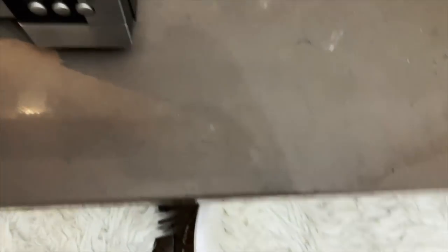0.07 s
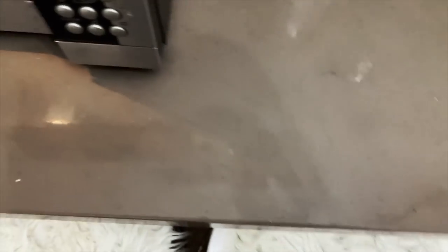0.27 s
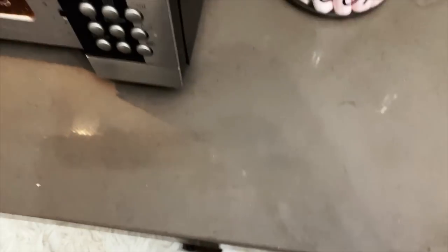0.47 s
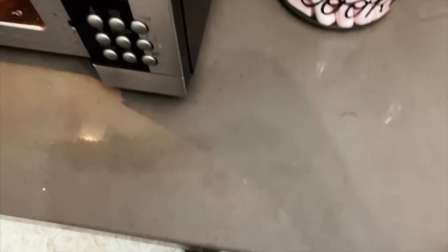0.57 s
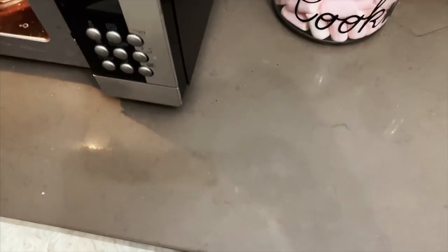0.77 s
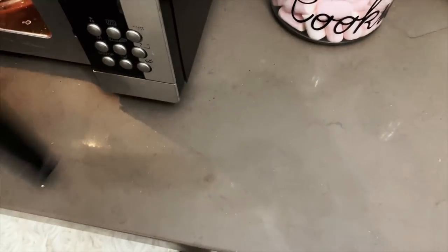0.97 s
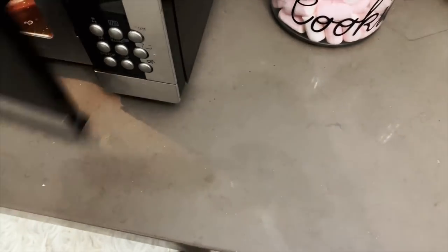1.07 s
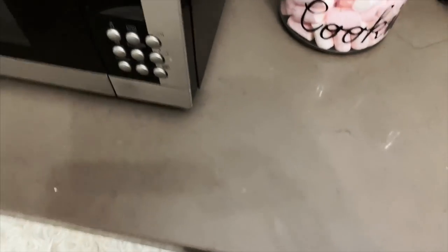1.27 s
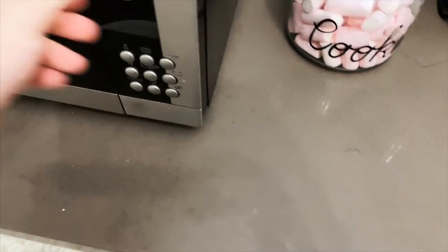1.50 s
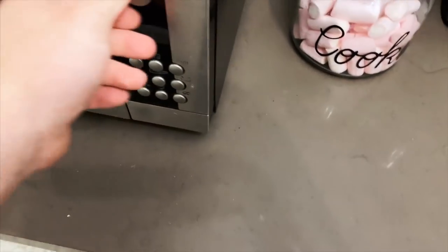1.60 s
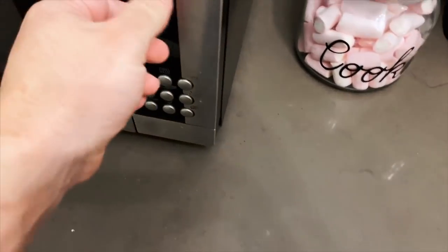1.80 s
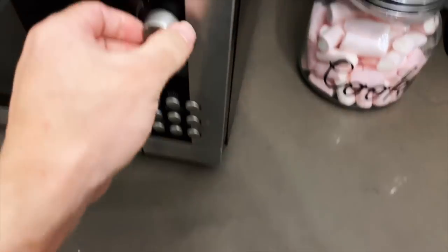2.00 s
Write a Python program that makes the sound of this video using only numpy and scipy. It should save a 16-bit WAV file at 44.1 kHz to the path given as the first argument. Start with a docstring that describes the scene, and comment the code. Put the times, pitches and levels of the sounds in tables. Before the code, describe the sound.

A microwave door closing, heard close in a lightly reverberant kitchen. A dull knock is already fading at 0 seconds, its low hum lingering under faint scuffs, soft bumps and tiny sharp ticks. Around 1.1 seconds the hooks hit, the latch snaps and the door thumps the hollow metal case. A ringing clack follows at 1.3, then quiet dial clicks from 1.76 to 1.9 over low rumble and light rustle.

```python
"""Microwave door pushed shut

An earlier knock hums on in a kitchen while scuffs, soft bumps and small sharp ticks come and go.
Heard close by, hooks meet a catch, a latch snaps, the door thumps on the hollow case and a clack follows inside.
Then a dial turns through a few detents. Blows are shaped bursts of banded noise; ringing parts are decaying sines.
Rumble and rustle are coloured noise; the mix leans slightly left."""
import sys
import numpy as np
from scipy import signal
from scipy.io import wavfile

SR = 44100
rng = np.random.default_rng(int(sys.argv[2]) if len(sys.argv) > 2 else 0)


def generate_wav(signal):
    """Clip the signal to [-1, 1] and save it as 16-bit WAV at the path in sys.argv[1]."""
    frames = np.transpose(np.atleast_2d(signal))
    scaled = np.clip(frames, -1, 1) * 32767
    pcm = np.round(scaled).astype(np.int16)
    wavfile.write(sys.argv[1], SR, pcm)


N = 90404
AGE = np.arange(SR) / SR   # time since a sound began, s
EDGES_HZ = 22 * 2 ** (np.arange(30) / 3)   # third octaves
CENTRES_HZ = np.sqrt(EDGES_HZ[1:] * EDGES_HZ[:-1])
MODE_SWELL_CYCLES = 2.33   # high modes speak at once, low ones bloom
WAVER = 0.35   # depth of a mode's swings, in log gain and in radians of phase

# correlation of the left and right channels: (frequency [Hz], likeness [-1 to 1])
STEREO_LIKENESS = [(60, 1), (170, 0.91), (350, 0.84), (700, 0.09), (1300, -0.017), (2600, 0.13),
                   (5000, 0.12), (12000, 0.055)]


def from_db(db):
    """Decibels to gain."""
    return 10 ** (np.asarray(db) / 20)


def at_bands(points):
    """Reads a table over frequency at the band centres, on a logarithmic frequency axis."""
    hz, value = np.transpose(points)
    return np.interp(np.log(CENTRES_HZ), np.log(hz), value)


def dying(t60):
    """One second of exponential decay, falling 60 dB in t60 seconds."""
    return np.exp(-np.log(1000) * AGE / t60)


def add(out, s, sound):
    """Mixes a sound in at time s, trimming whatever falls outside the scene."""
    start = int(round(s * SR))
    first, last = max(start, 0), min(start + sound.shape[-1], N)
    out[:, first:last] += sound[..., first - start:last - start]


def noise_bands():
    """White noise in third octaves, nearly mono in the bass and wide above: bands x 2 x N."""
    white = rng.standard_normal((2, 2, N + SR // 2))
    likeness = np.clip(at_bands(STEREO_LIKENESS), -.99, .995)
    bands = []
    for k, alike in enumerate(likeness):
        sos = signal.butter(2, EDGES_HZ[k:k + 2], "band", fs=SR, output="sos")
        # neighbouring bands use different noise; the filter's start-up is dropped
        mid, side = signal.sosfilt(sos, white[k % 2])[:, -N:]
        common = np.sqrt((1 + alike) / 2) * mid
        opposed = np.sqrt((1 - alike) / 2) * side * [[1], [-1]]
        bands.append(common + opposed)
    return np.array(bands, dtype=np.float32)


def blows(bands, rows, colour, ring_s, room_db, crack=0):
    """Each blow is a noise burst with a short ring (t60 ring_s) and a kitchen tail; low bands build up later."""
    # decay of the kitchen: (frequency [Hz], t60 [s])
    room_t60 = [(60, 1), (150, 0.96), (450, 0.61), (1000, 0.64), (2500, 0.5), (5000, 0.48), (9000, 0.43),
                (14000, 0.21)]
    swell_cycles, room_build_s, crack_s = 0.51, 0.004, 0.0022   # crack: t60 of the sharp first instant
    tilt_pivot_hz = 4000
    quiet_db = -27   # blows at or below this level are cut to a third of a second

    out, age = np.zeros((2, N)), AGE.astype(np.float32)
    room = np.exp(np.outer(-np.log(1000) / at_bands(room_t60), age).astype(np.float32))
    build = (from_db(room_db) * (1 - np.exp(-AGE / room_build_s))).astype(np.float32)
    swell = np.minimum(np.outer((CENTRES_HZ / swell_cycles).astype(np.float32), age), 1)
    own_ring = (dying(ring_s) + crack * dying(crack_s)).astype(np.float32)
    shape = swell * (own_ring + build * room)
    octaves = np.log2(CENTRES_HZ / tilt_pivot_hz)
    for s, db, *tilt in rows:
        gains = from_db(db + at_bands(colour) + sum(tilt) * octaves).astype(np.float32)
        size = SR if db > quiet_db else SR // 3
        start = rng.integers(N - SR)   # a random stretch of noise for each blow
        noise = bands[:, :, start:start + size]
        add(out, s, np.einsum("bct,bt->ct", noise, shape[:, :size] * gains[:, None]))
    return out


def ringing(modes, swell_cycles=MODE_SWELL_CYCLES, waver=WAVER):
    """Struck modes swell, waver and die as sines; less alike frequencies differ more in phase left to right."""
    wavers_per_s = 29.3
    out = np.zeros((2, SR))
    for k, (hz, db, t60) in enumerate(modes):
        alike = np.interp(hz, CENTRES_HZ, at_bands(STEREO_LIKENESS))
        apart = np.arccos(np.clip(alike, -1, 1)) / 2 * (-1) ** k   # the leading side alternates
        walks = rng.standard_normal(size=(2, 100))
        swing, slip = (waver * np.interp(AGE * wavers_per_s, np.arange(len(w)), w) for w in walks)
        swell = 1 - np.exp(-(AGE * hz / swell_cycles) ** 2)
        strength = from_db(db) * swell * dying(t60) * np.exp(swing)
        out += strength * np.sin(2 * np.pi * hz * AGE + slip + [[apart], [-apart]])
    return out


def wash(bands, colour):
    """Steady coloured noise, rms 1."""
    x = np.einsum("bct,b->ct", bands, from_db(at_bands(colour)).astype(np.float32))
    return x / x.std()


def without_bass(x):
    """Small hard parts radiate little deep bass, so their contacts are high-passed."""
    # the tiny offset keeps the filter out of denormal numbers
    return signal.sosfilt(signal.butter(4, 101, "high", fs=SR, output="sos"), x + 1e-18)


def hooks(bands):
    """The hooks strike the catch: two hard contacts, and the brief ring of the catch."""
    # contacts: (time [s], level [dB], tilt [dB per octave])
    contacts = [(1.109, -7.5, 1.5), (1.1118, -13.5, -1.5)]
    # spectrum of a contact: (frequency [Hz], level [dB])
    colour = [(40, -20), (130, 5.5), (400, 0), (750, 5), (1400, -7.5), (2400, -4), (4500, -10),
              (8000, -19.5), (14000, -19.5)]
    # resonances of the catch: (frequency [Hz], level [dB], t60 [s])
    catch_modes = [(466, 10.5, 0.074), (642, -1.5, 0.18), (1017, -5.5, 0.11), (2420, -4.5, 0.03),
                   (4820, -4, .05)]
    out = without_bass(blows(bands, contacts, colour, ring_s=0.055, room_db=-2.5))
    add(out, contacts[0][0], from_db(-18) * ringing(catch_modes))
    return out


def latch(bands):
    """The latch snaps over in a quick run of bright contacts and sets off the door's metal skin."""
    # snaps: (time [s], level [dB], tilt [dB per octave])
    snaps = [(1.132, -12, -0.5), (1.1341, -10.5, -5), (1.1389, -14, -5.5), (1.1438, -10.5, 1),
             (1.1482, -14.5, -2.5), (1.1603, -13.5, -2.5)]
    # spectrum of a snap: (frequency [Hz], level [dB])
    colour = [(200, -2), (700, -4.5), (2000, 1.5), (3800, 6), (5500, 0.5), (7500, 3.5), (10000, 2.5),
              (14000, 3)]
    # resonances of the door's skin: (frequency [Hz], level [dB], t60 [s])
    skin_modes = [(1007.6, -3.5, 0.55), (1008, -7, .35), (1206, -3, 0.3), (1344, -3.5, 0.67),
                  (1374, -3, 0.74), (1494, -13, 0.42), (2090, 6, 0.17), (2490, -7, 0.63), (2687, -2, 0.11),
                  (3190, -3.5, 0.34), (3820, -7, 0.17), (7580, -4, 0.2)]
    skin_s, skin_db = 1.147, -23.5
    out = without_bass(blows(bands, snaps, colour, ring_s=0.026, room_db=-19.5))
    add(out, skin_s, from_db(skin_db) * ringing(skin_modes))
    return out


def slam(bands):
    """The door lands and chatters; its weight pushes the hollow case, which booms at its low modes."""
    # landings: (time [s], level [dB])
    landings = [(1.1515, -1.5), (1.165, -6.5), (1.178, -18), (1.185, -10)]
    # spectrum of a landing: (frequency [Hz], level [dB])
    colour = [(30, -26), (70, -5), (130, 11), (240, 0.5), (600, 6), (1000, -4.5), (2100, -6.5), (4000, -15),
              (8000, -20), (14000, -33)]
    # resonances of the case: (frequency [Hz], level [dB], t60 [s])
    case_modes = [(60.7, -25, 0.57), (103.4, -21.5, 0.5), (121.5, -15, 0.3), (134.2, -1.5, 0.12),
                  (166.6, -21, 0.44), (209, -13, 0.19), (268, -14, 0.29), (324, -26.5, 0.36),
                  (409.3, -23, 0.37), (533.3, -23.5, 0.49), (646.7, -22, 0.18), (672, -21.5, 0.34),
                  (788, -28, 0.35)]
    thump_s, thump_db = 1.148, 4.5
    out = without_bass(blows(bands, landings, colour, ring_s=0.056, room_db=-7))
    add(out, thump_s, from_db(thump_db) * ringing(case_modes, swell_cycles=0.65, waver=0.075))
    return out


def clack(bands):
    """A part inside drops home and rings the sheet metal, whose modes beat near 2.5 kHz."""
    # contacts: (time [s], level [dB])
    contacts = [(1.2963, -10), (1.304, -18)]
    # spectrum of a contact: (frequency [Hz], level [dB])
    colour = [(60, -27), (100, -6), (170, 13), (280, 5), (450, 11.5), (700, -3.5), (1300, 2), (2900, -1),
              (4200, -1), (6000, -8.5), (8000, -13.5), (14000, -29)]
    # resonances of the sheet metal: (frequency [Hz], level [dB], t60 [s])
    panel_modes = [(91.1, -7, 1), (157.9, 2, 0.73), (350.3, 0, 0.37), (440, 5, 0.1), (463, 5.5, 0.48),
                   (892, -1.5, 0.3), (1134, -1.5, 0.14), (1410, -10, 0.2), (1861, 2.5, 0.059),
                   (2379, -14, 0.53), (2546, -6.5, 0.41), (2595, -5, 0.43), (3090, -14, 0.53),
                   (3810, -0.5, 0.1), (3940, 5, 0.074), (4380, 3, 0.04)]
    out = without_bass(blows(bands, contacts, colour, ring_s=0.022, room_db=-8))
    add(out, contacts[0][0], from_db(-24.5) * ringing(panel_modes, waver=0.44))
    return out


def dial(bands):
    """Each detent clicks at a listed pitch, between about 4 and 5 kHz, and rings the plastic knob."""
    # detents: (time [s], level [dB], pitch of the click [Hz])
    detents = [(1.763, -35, 3960), (1.7842, -33.5, 4480), (1.8074, -32.5, 4900), (1.8317, -34.5, 5070),
               (1.873, -35.5, 5070), (1.9074, -39, 4730)]
    # spectrum of a click: (frequency [Hz], level [dB])
    colour = [(150, 19.5), (600, -5), (1300, 3), (2300, 6.5), (4500, 7.5), (6500, -2), (10000, 6.5),
              (14000, -5)]
    # resonances of the knob: (frequency [Hz], level [dB], t60 [s])
    knob_modes = [(2280, -8, 0.1), (3040, -5.5, 0.07), (3270, -1, 0.096), (4620, -3, 0.038),
                  (5220, -5.5, 0.055), (7440, 1.5, 0.016), (10170, 7.5, 0.01)]
    click_ring_s = 0.018
    knob_db, ping_db = -3, 9.5   # the ping is one more mode, at the listed pitch
    clicks = [(s, db) for s, db, _ in detents]
    out = blows(bands, clicks, colour, click_ring_s, room_db=-18.5)
    for s, db, hz in detents:
        ping = (hz, ping_db, click_ring_s)
        add(out, s, from_db(db + knob_db) * ringing(knob_modes + [ping]))
    return out


def through_body(x):
    """The oven's body lifts some narrow frequency regions and swallows others."""
    # resonances and hollows: (frequency [Hz], width [Hz], gain [dB])
    body = [(1935, 71, -7.5), (2650, 140, 1.5), (3290, 350, -5.5), (3760, 290, 2), (4040, 120, -4.5),
            (4850, 280, -5.5), (5940, 200, 3.5)]
    for hz, width_hz, db in body:
        region = signal.lfilter(*signal.iirpeak(hz, hz / width_hz, fs=SR), x + 1e-18)
        x = x + (from_db(db) - 1) * region
    return x


def knock(bands):
    """An earlier knock: two dull blows whose long resonances hum on."""
    # blows, the first before the scene starts: (time [s], level [dB])
    raps = [(-.02, -17.5), (.016, -34.5)]
    # spectrum of a blow: (frequency [Hz], level [dB])
    colour = [(30, -2), (70, 2), (150, 1), (400, 2.5), (900, -7.5), (2500, -10.5), (6000, -23.5),
              (14000, -31)]
    # resonances left humming: (frequency [Hz], level [dB], t60 [s])
    hum_modes = [(141.7, -4.5, 1.45), (161.3, -3.5, 0.63), (227.3, 4.5, 0.31), (366.5, -11, 1.45),
                 (455, -13.5, 1.2), (472.6, -11.5, 1.25), (582, -16.5, 1.24), (1400, -18.5, 0.94),
                 (2130, -20, 0.71), (2799, -19, 0.57)]
    out = blows(bands, raps, colour, ring_s=0.081, room_db=5.5)
    for s, db in raps:
        add(out, s, from_db(db - 11) * ringing(hum_modes))
    return out


def bumps(bands):
    """Soft bumps of handling: dull noise bursts centred on the middle frequencies."""
    # bumps: (time [s], level [dB])
    touches = [(.366, -43), (.595, -53.5), (.948, -49), (1.031, -39.5)]
    # spectrum of a bump: (frequency [Hz], level [dB])
    colour = [(100, -17), (400, 0), (750, 11.5), (1400, 3), (2500, -14), (5000, -29), (14000, -37)]
    return blows(bands, touches, colour, ring_s=0.1, room_db=-11)


def scuffs(bands):
    """Soft scuffs of movement: faint, brighter noise bursts."""
    # scuffs: (time [s], level [dB])
    rubs = [(.150, -51), (.246, -54.5), (0.35, -54), (0.419, -49), (0.524, -52), (0.689, -51.5),
            (.785, -52), (0.882, -52.5)]
    # spectrum of a scuff: (frequency [Hz], level [dB])
    colour = [(300, -17), (1500, 7), (3000, -2), (5500, 2), (8000, -7.5), (10500, 4), (14000, -2)]
    return blows(bands, rubs, colour, ring_s=0.083, room_db=-8.5)


def clink():
    """One tiny clink as the door swings: a few high modes that die at once."""
    # resonances of the clink: (frequency [Hz], level [dB], t60 [s])
    clink_modes = [(4920, 5.5, 0.015), (5300, 0, 0.016), (6060, 1.5, 0.014)]
    out = np.zeros((2, N))
    add(out, 1.0295, from_db(-43) * ringing(clink_modes))
    return out


def small_ticks(bands):
    """Small sharp ticks: treble bursts with an extra crack in their first instant."""
    # ticks: (time [s], level [dB])
    times = [(0.0415, -27.5), (0.426, -30.5), (0.4756, -30), (0.5218, -28), (0.5769, -28.5), (1.374, -28),
             (1.454, -32), (1.56, -31), (1.6838, -30), (1.7504, -28.5), (1.9055, -29), (1.9126, -31),
             (1.991, -26)]
    # spectrum of a tick: (frequency [Hz], level [dB])
    colour = [(300, -13), (1500, -33), (4000, -15), (7000, -29), (10200, 2), (12000, -3.5), (14000, -7),
              (16000, -6)]
    return blows(bands, times, colour, ring_s=0.026, room_db=-19.5, crack=from_db(4))


def rustle(bands):
    """Faint rustle of movement: coloured noise with a drawn level and a fast random flutter."""
    # course of the rustle: (time [s], level [dB])
    course = [(0, -63), (.33, -77), (0.362, -55.5), (.43, -48.5), (.61, -51), (.67, -60.5), (.78, -61.5),
              (.87, -53), (1.0, -54.5), (1.08, -52.5), (1.7, -53), (1.9, -45), (2.05, -55)]
    # spectrum of the rustle: (frequency [Hz], level [dB])
    colour = [(100, 6), (400, 1.5), (800, -4.5), (1600, -6), (3000, -14.5), (5500, -14), (8000, -21),
              (14000, -21.5)]
    flutter_db, flutters_per_s = 3, 70
    t = np.arange(N) / SR
    flutter = np.interp(t * flutters_per_s, np.arange(SR), rng.standard_normal(SR))
    level_db = np.interp(t, *np.transpose(course)) + flutter_db * flutter
    # noise run backwards, so that it does not follow the rumble
    return from_db(level_db) * wash(bands[:, :, ::-1], colour)


def rumble(bands):
    """Low room rumble: steady noise with most of its weight in the bass."""
    # spectrum of the rumble: (frequency [Hz], level [dB])
    colour = [(25, -14), (60, 1), (140, 2), (250, -6.5), (450, -11.5), (800, -22), (3000, -31.5),
              (14000, -52)]
    return from_db(-50) * wash(bands, colour)


def scene():
    """All sources together, a little to the left; door, clack and dial pass through the oven's body."""
    bands = noise_bands()
    door = hooks(bands) + latch(bands) + slam(bands)
    oven = through_body(door + clack(bands) + dial(bands))
    handling = bumps(bands) + scuffs(bands) + clink()
    background = rustle(bands) + rumble(bands)
    mix = oven + knock(bands) + handling + small_ticks(bands) + background
    left_db = 0.36   # left over right
    return mix * from_db([[left_db / 2], [-left_db / 2]])


def overload(x):
    """Rounds the highest peaks smoothly towards full scale and leaves the rest nearly untouched."""
    full_scale = 0.94
    return x / (1 + (x / full_scale) ** 8) ** (1 / 8)


def record(dry):
    """The deepest bass is removed and two treble regions are thinned; peaks are rounded, the top is cut."""
    # thinned treble regions: (frequency [Hz], width [Hz])
    treble_dips = [(8450, 920), (12050, 2650)]
    low_hz, cutoff_hz = 42, 14800
    dry = signal.sosfilt(signal.butter(3, low_hz, "high", fs=SR, output="sos"), dry)
    for hz, width_hz in treble_dips:
        dry = signal.lfilter(*signal.iirnotch(hz, hz / width_hz, fs=SR), dry)
    return signal.sosfilt(signal.butter(22, cutoff_hz, fs=SR, output="sos"), overload(dry))


dry = scene()
out = record(dry)
generate_wav(out)
```